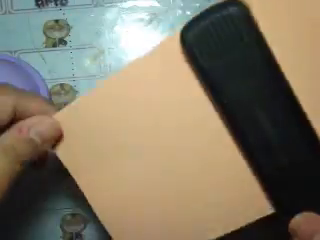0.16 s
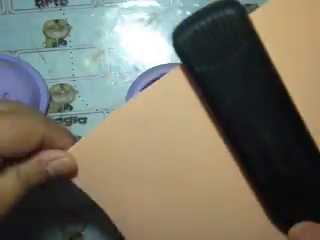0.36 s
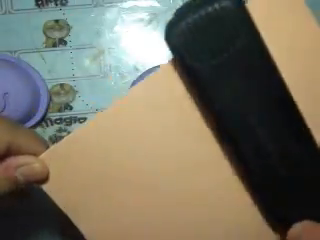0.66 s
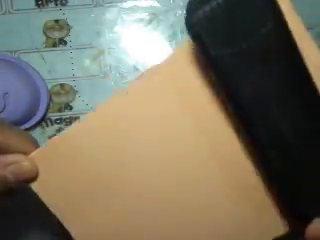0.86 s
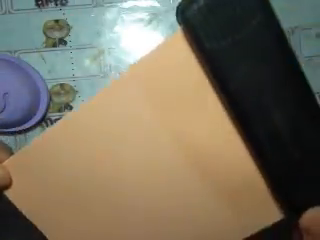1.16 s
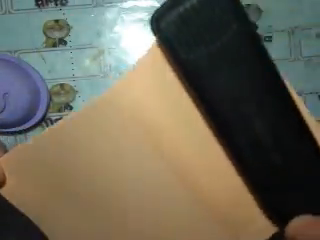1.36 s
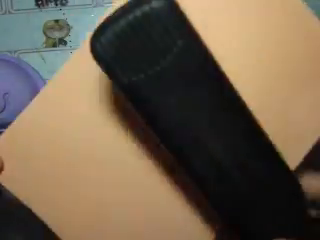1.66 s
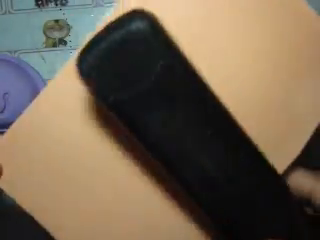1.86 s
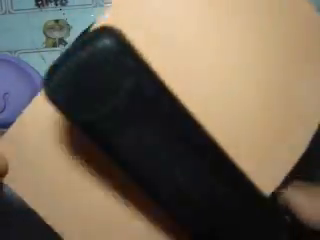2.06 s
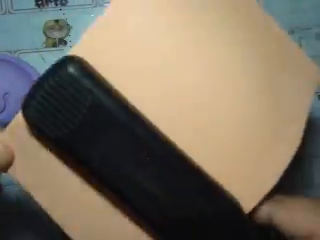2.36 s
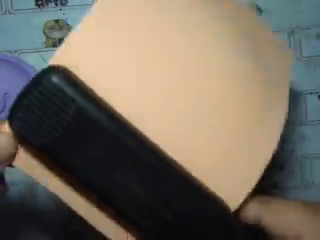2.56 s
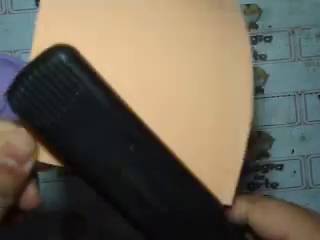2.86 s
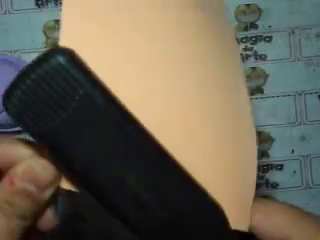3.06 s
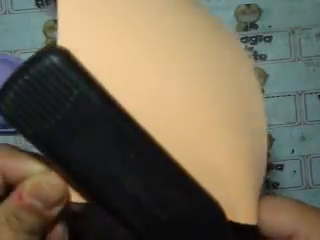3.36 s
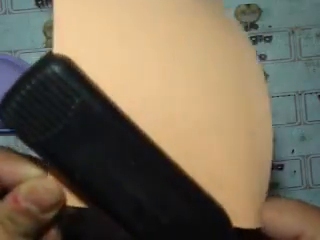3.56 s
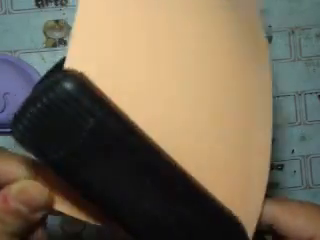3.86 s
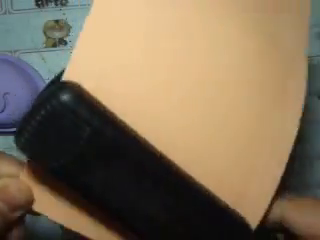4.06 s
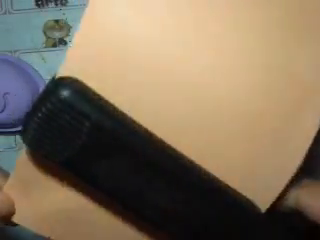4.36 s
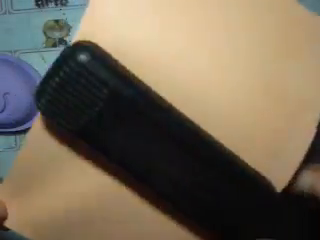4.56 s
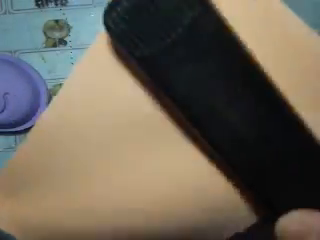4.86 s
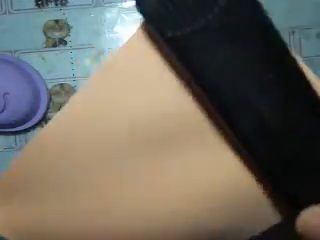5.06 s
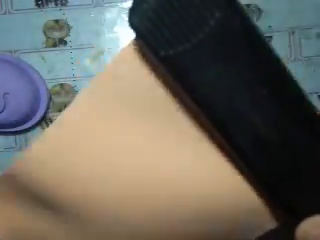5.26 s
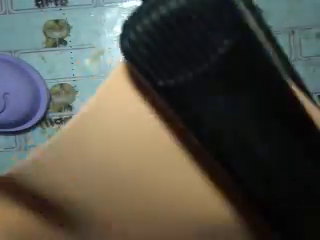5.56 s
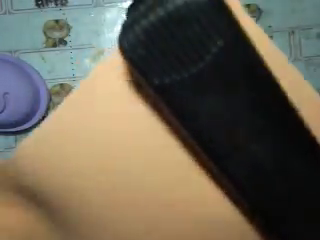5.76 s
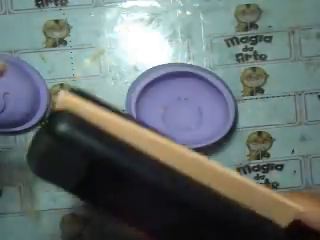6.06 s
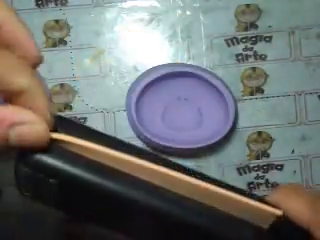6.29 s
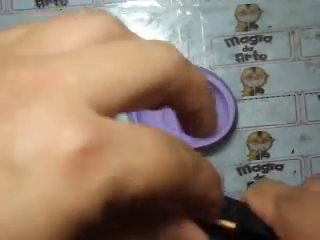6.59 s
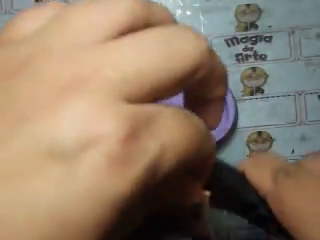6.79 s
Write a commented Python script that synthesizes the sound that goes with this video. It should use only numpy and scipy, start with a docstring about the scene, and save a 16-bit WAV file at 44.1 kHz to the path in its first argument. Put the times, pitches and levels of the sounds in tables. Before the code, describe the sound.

A loud plastic clack strikes at once, followed by a brief foam slide. From about 0.35 seconds, hinged plates snap shut roughly every 0.2 seconds until 5.86. Each clamp is a hard, mid-bright tick with a few milliseconds of uneven rattle, a small padded thud and a short room echo; the strongest distort. Fainter opening clicks fall between, with scattered light knocks, busiest around 1.45 to 1.75. Snaps weaken around 2.5 to 2.9, then strengthen again from 3.3. Soft, grainy foam hiss fills the gaps, dipping just after clamps. Far behind, low traffic rumbles and a vehicle's drone climbs in pitch from about 2.4 to 6 seconds. After 5.9 the clacking ceases: quiet sliding swells near 6.25, faint knocks pass, then a modest opening click at 6.83 and small taps end it near 6.9. The microphone is close, its treble muffled.

```python
"""Snapping plastic tongs

Plastic tongs snap open and shut about five times a second on a foam sheet, close to a narrow-band microphone.
Each blow is a tick and an uneven burst of clicks ringing the shell, with a short echo; filtered clicks rustle after.
The sheet slides with a hiss of dense clicks, hushed just after each clamp. Behind it lie room air, traffic rumble
in coloured noise and a vehicle speeding up in gliding sines. The loudest snaps overload the recorder.
"""
import sys
import numpy as np
from scipy import signal
from scipy.io import wavfile

SR = 44100
rng = np.random.default_rng(int(sys.argv[2]) if len(sys.argv) > 2 else 0)


def store_pcm(level_fs):
    """Save levels as 16-bit WAV."""
    pcm = np.round(np.clip(level_fs, -1, 1) * 32767).astype(np.int16)
    wavfile.write(sys.argv[1], SR, np.atleast_2d(pcm).T)


N = 305613

# Plates clamp shut: t/s, peak level/dB, low modes level/dB, brightness/dB, rattle length/ms
CLAMPS = [(0.0005, 2, -12, -7, 3.86), (0.364, -2.5, -12, 7.5, 7), (0.574, -1.5, -10.5, 7, 8.8),
          (0.758, -2, -8.5, 9.5, 8), (0.946, -3.5, -12, 4, 5.86), (1.131, -0.2, -11, 3, 6.7),
          (1.313, -2.2, -14.5, 1, 6.8), (1.547, 0.2, -13, 1, 7.9), (1.758, -5.5, -15, -9, 6.9),
          (1.948, 1, -14.5, -6, 8.2), (2.141, 2, -10, -2, 6.9), (2.339, 0.2, -9, 0.5, 6.7),
          (2.538, -5.5, -8.5, -1, 3.5), (2.71, -11.5, -18.5, 3, 6.4), (2.91, -15, -12.5, -2, 3.4),
          (3.121, -6, -13.5, -15.5, 4.43), (3.32, 1.5, -13, 2, 8.24), (3.52, -2.5, -5.5, 6, 6.47),
          (3.723, 0, -10.5, 7.5, 9.94), (3.916, -2.5, -12.5, 2, 7), (4.105, -4, -8.5, -1.5, 5.01),
          (4.285, -2.5, -9.5, 0.5, 5.45), (4.478, -4, -8.5, -4, 4.4), (4.678, -5.5, -11.5, -5.5, 3.28),
          (4.879, -1.5, -13.5, -7, 4.77), (5.09, -1.5, -10.5, 2, 6), (5.274, -3, -10.5, -1.5, 5.25),
          (5.474, -5.5, -8.5, -18, 6.96), (5.671, -0.8, -7.5, 2, 7.7), (5.856, -6, -8.5, -12, 8.1)]
# Arms spring open against the hinge stop: t/s, peak level/dB, low modes level/dB, brightness/dB
OPENINGS = [(0.295, -18.5, -22, 0), (0.496, -12.5, -21, 7), (0.685, -16, -39, -0.5), (0.873, -15, -42, 3),
            (1.058, -16, -29, 2), (1.247, -17.5, -23, 2), (1.426, -19.5, -24, 3), (1.646, -18.5, -21, 2.5),
            (1.855, -16.5, -23, -7), (2.048, -18, -25, -10), (2.244, -21, -27, 2), (2.44, -17.5, -27, -1),
            (2.645, -15, -28, 3), (2.834, -27.5, -16, 0), (3.042, -21.5, -13, 2), (3.258, -28.5, -10, 1),
            (3.453, -22.5, -10.5, 0), (3.658, -21, -21, -3), (3.852, -22, -13, -2), (4.053, -18.5, -18, 3),
            (4.234, -15.5, -16, -1.5), (4.415, -18, -10.5, -1.5), (4.614, -14.5, -16.5, 3.5),
            (4.806, -19.5, -22, 5.5), (5.011, -17, -37, 4), (5.217, -21, -16, 4.5), (5.403, -9.5, -25, -16),
            (5.571, -16.5, -18, 2.5), (5.789, -18, -22, -0.5), (6.827, -14, -17.5, 2)]
# Light knocks of plates and sheet on the way shut: t/s, peak level/dB, low modes level/dB, rattle length/ms
KNOCKS = [(0.56, -26, -10, 15), (0.72, -34, -25, 7.4), (0.746, -23, -13, 4.4), (0.751, -24, -20, 2.7),
          (0.906, -24, -21, 9), (0.926, -27, -8, 2.7), (0.933, -34, -4, 5.4), (1.094, -23, -25, 9.3),
          (1.118, -22.5, -19, 13), (1.281, -24, -13, 6.5), (1.435, -24.5, -19, 5.8), (1.451, -33, -21, 9),
          (1.472, -10, -21, 8.9), (1.487, -13, -19, 5.1), (1.536, -19, -20, 4.6), (1.657, -21.5, -24, 6.1),
          (1.697, -17, -23, 9.4), (1.738, -20.5, -6, 3.3), (1.744, -8, -8.5, 2.4), (1.902, -26.5, -10, 7.5),
          (1.934, -25.5, -9, 4), (2.099, -23.5, -17, 5.4), (2.128, -19, -9, 7.6), (2.296, -30, -15, 12),
          (2.317, -26, -8, 4.3), (2.492, -29, -17, 3.8), (2.506, -21.5, -6, 6.7), (2.528, -17, -11, 3),
          (2.675, -20.5, 0, 2.66), (2.728, -14.5, -8, 6.75), (2.874, -23.5, -12, 7.4),
          (3.073, -25, -11, 12), (3.112, -26, 1.5, 5.3), (3.293, -23.5, -9, 5.5), (3.896, -25, -8, 3.5),
          (4.083, -26, -14, 12), (4.27, -29.5, -3, 10.5), (4.465, -28, -17, 10.5), (4.868, -24.5, -6, 6.7),
          (5.048, -34, 1, 6.1), (5.249, -24.5, -15, 6.6), (5.44, -27, -8, 9.3), (5.619, -34.5, -8, 15),
          (5.66, -17, -25, 4.7), (5.826, -27, -12, 4.7), (6.018, -36, -8, 11), (6.26, -41, -10, 8),
          (6.46, -49, -9, 14), (6.761, -37, -25, 6), (6.869, -30, -21, 6), (6.923, -23.5, -20, 5.9)]
# Ringing modes of the plastic shell: f/Hz, level/dB, t60/s
SHELL_MODES = [(778, -13.5, 0.015), (988, -11.5, 0.02), (1249, -14, 0.023), (1471, -7, 0.01),
               (1651, -5, 0.012), (1908, -2.5, 0.0095), (2180, -1, 0.0072), (2468, -7.5, 0.015),
               (2846, -7.5, 0.019), (3008, -3, 0.018), (3280, -8.5, 0.024), (3614, -7, 0.015),
               (3900, -14, 0.014), (4254, -27, 0.024), (4833, -20.5, 0.0076), (5270, -20, 0.0056)]
# Arms pushed through the foam: f/Hz, level/dB, t60/s
THUD_MODES = [(236, -23.5, 0.02), (424.6, 3.5, 0.017), (574, 3.5, 0.017)]
# Sliding sheet: t/s, middle hiss level/dB, upper hiss against it/dB, lower hiss against it/dB
SLIDE = [(0.0, -31.5, 2.5, -10), (0.12, -40.5, 0, -4.5), (0.23, -44, 1, -0.5), (0.5, -43, -2, -5),
         (1.1, -35, -13, -10.5), (1.7, -39.5, -4, -5), (2.4, -36.5, -10.5, -7.5), (3.4, -34.5, -11, -6.5),
         (4.0, -37, -9, -8), (4.5, -41, -10, -4), (4.8, -43.5, -7, -5.5), (5.0, -36, -10, -6.5),
         (5.6, -39.5, -8, -6.5), (5.93, -41, -11, -3.5), (6.07, -41, -9, -1.5), (6.25, -36.5, -15, -11),
         (6.45, -38, -12, -5), (6.6, -43, -6, -12.5), (6.76, -44.5, -4, 2), (6.93, -36.5, -4, -7)]
# Resonances of the three hisses, relative levels: f/Hz, width/Hz, level/dB
MIDDLE_HISS = [(2385, 280, -2), (2620, 160, 0), (2930, 620, -1.5)]
UPPER_HISS = [(3050, 660, 4.5), (3830, 360, -4.5), (4240, 860, -3.5)]
LOWER_HISS = [(1440, 120, 7), (1656, 130, 4.5), (1875, 250, -13.5)]
# Firing tone and lower drone of the vehicle: t/s, f/Hz, level/dB
FIRING = [(0.9, 84, -48), (1.05, 84.1, -38.5), (1.4, 81.76, -49), (2.0, 80.9, -39), (2.4, 82.2, -45),
          (2.65, 85, -38), (3.199, 91.75, -35.5), (3.45, 96, -40.5), (3.95, 101.5, -36.5),
          (4.3, 111.7, -40), (4.7, 121.1, -41.5), (5.082, 135, -45.5), (5.5, 147, -38), (5.979, 153, -43.5),
          (6.1, 156, -58)]
DRONE = [(2.4, 50.2, -42.5), (2.999, 54.3, -34.5), (3.55, 53.8, -32), (3.89, 55.64, -44),
         (4.34, 61.54, -42), (4.76, 62, -48), (5.099, 77.2, -46), (5.5, 87.14, -38.5), (5.961, 84, -39),
         (6.2, 84.5, -44)]
# Exhaust resonances, as overtones against their tone: f/Hz, level/dB
EXHAUST = [(100, -28), (120, -5), (158, -20), (178, -4), (205, -32), (270, -26), (345, -10.5), (400, -9),
           (470, -29)]
# Spectrum of the traffic, relative: f/Hz, level per Hz/dB
TRAFFIC_SPECTRUM = [(20, -17), (30, 8.5), (45, 4.5), (85, 5), (130, -1.5), (185, -9.5), (215, -29),
                    (260, -27)]
# Traffic loudness over time: t/s, level/dB
RUMBLE = [(0.0, -38), (0.75, -47.5), (1.02, -38), (1.31, -42), (1.97, -37), (2.4, -40.5), (3.5, -38.5),
          (4.9, -36.5), (6.4, -38), (6.93, -36)]
# Spectrum of the room air, relative: f/Hz, level per Hz/dB
AIR_SPECTRUM = [(190, -13), (250, -14.5), (340, 1), (650, -9.5), (1000, -7.5), (2000, -9.5), (3000, -5.5),
                (4300, -24.5), (5300, -13.5), (6500, -32)]

# Upper and top modes of each kind of blow against the middle ones
CLAMP_UPPER_DB = 1.5
OPENING_UPPER_DB, OPENING_TOP_DB, OPENING_RATTLE_MS = 4.5, -5.5, 5.8
KNOCK_UPPER_DB, KNOCK_TOP_DB = 6, -11.5
UPPER_SHARE = 0.14   # share of a blow's brightness that also reaches the upper modes
LIGHT_FADE = 0.31   # the lighter the blow, the faster its rattle fades (dB per dB)
REBOUND_MS, REBOUND_DB = 9.1, -19   # the arms bounce back once
CRACK_DB, CRACK_HZ, CRACK_WIDTH_HZ = 10.5, 2500, 3160   # the tick of first contact
ROOM_T60_S, ROOM_ECHO_DB = 0.11, -22.5
RUSTLE_DB, RUSTLE_T60_S = -35.5, 0.16
GRIP_DB, GRIP_HOLD_S, GRIP_RELEASE_S = -4, 0.093, 0.04   # the shut plates hold the sheet still
HISS_PATCHY_DB = 2.5   # each band of the hiss wavers on its own
AIR_DB = -44.5
MIC_LOW_HZ, MIC_STOP_HZ, RECORDER_STOP_HZ = 35, 6150, 16800   # low cut, then where each top cut is complete


def blows():
    """Every blow of the tongs: t/s, then peak, low, upper and top mode levels/dB, then rattle length/ms."""
    rows = []
    for t, peak_db, lows_db, bright_db, rattle_ms in CLAMPS:
        upper_db = CLAMP_UPPER_DB + UPPER_SHARE * bright_db
        rows.append((t, peak_db, lows_db, upper_db, bright_db, rattle_ms))
    for t, peak_db, lows_db, bright_db in OPENINGS:
        upper_db = OPENING_UPPER_DB + UPPER_SHARE * bright_db
        rows.append((t, peak_db, lows_db, upper_db, OPENING_TOP_DB + bright_db, OPENING_RATTLE_MS))
    for t, peak_db, lows_db, rattle_ms in KNOCKS:
        rows.append((t, peak_db, lows_db, KNOCK_UPPER_DB, KNOCK_TOP_DB, rattle_ms))
    return np.array(rows)


def snaps():
    """First contact, quick uneven rattle and rebound strike each shell mode with a strength of its own."""
    s, peak_db, lows_db, upper_db, top_db, rattle_ms = blows().T[:, :, None]
    # contact 0 is the first, 1 to 5 rattle on in their slots, the last two are the rebound
    contacts = 8
    slot = np.arange(contacts)
    late = (slot + rng.random((len(s), contacts))) * (slot > 0) / contacts   # share of the rattle length
    delay_ms = late * rattle_ms
    delay_ms[:, -2:] = REBOUND_MS + 1.3 * rng.standard_normal((len(s), 2))
    at = np.clip(((s + delay_ms / 1000) * SR).astype(int), 0, N - 1)
    first = at[:, 0]
    strengths = rng.standard_normal((len(s), len(SHELL_MODES), contacts))
    out = np.zeros(N)
    for k, (hz, level_db, t60) in enumerate(SHELL_MODES):
        # where the blow lands sets how much it wakes the low, upper and top modes
        low, upper, top = np.clip([(1400 - hz) / 500, (hz - 2200) / 500, (hz - 3300) / 300], 0, 1)
        colour_db = low * (lows_db + 11.5) + upper * upper_db + top * top_db
        # the first contact is dull, the upper modes swell during the rattle
        fade_db = (LIGHT_FADE * peak_db - 8.5) * late
        contact_db = fade_db - 5.5 * upper * np.exp(-late / 0.049)
        # a firm clamp smothers the bounce, a light knock lets it through
        contact_db[:, -2:] = REBOUND_DB - 0.54 * peak_db
        gain = from_db(peak_db + colour_db + level_db + contact_db)
        clicks = clicks_at(at, gain * (0.17 + 1.204 * strengths[:, k]))
        # foam-padded contacts excite little beside the mode
        out += band(ring(clicks, hz, t60), hz, 0.63 * hz)
    return out + crack(first, peak_db[:, 0]) + thud(first, (peak_db + lows_db)[:, 0])


def crack(at, peak_db):
    """The first contact itself, a sharp click through a wide band-pass."""
    tick = clicks_at(at, from_db(peak_db + CRACK_DB)) + 1e-18
    return band(band(tick, CRACK_HZ, CRACK_WIDTH_HZ), CRACK_HZ, CRACK_WIDTH_HZ)


def thud(at, push_db):
    """The arms push through the foam: a few short low modes, uneven from blow to blow."""
    uneven_db = 3.7 * rng.standard_normal((len(at), len(THUD_MODES)))
    out = np.zeros(N)
    for k, (hz, level_db, t60) in enumerate(THUD_MODES):
        push = clicks_at(at, from_db(push_db + level_db + uneven_db[:, k]))
        out += band(ring(push, hz, t60), hz, 1.73 * hz)
    return out


def room(x):
    """Diffuse echo: the room answers with a dying noise after a short gap."""
    t = np.arange(SR // 4) / SR
    answer = rng.standard_normal(len(t)) * from_db(-60 * t / ROOM_T60_S) * (t > 0.004)
    return signal.fftconvolve(x, answer / np.sqrt(np.sum(answer ** 2)))[:N]


def rustle():
    """The struck sheet crackles on for a moment, dying away exponentially."""
    s, peak_db = blows().T[:2]
    shakes = np.zeros(N)
    shakes[(s * SR).astype(int)] = from_db(peak_db + RUSTLE_DB)
    dying = signal.lfilter([1], [1, -from_db(-60 / (RUSTLE_T60_S * SR))], shakes + 1e-18)
    resonances = [(2000, 650, 0), (3000, 600, -7.5), (3630, 420, -11.5)]   # f/Hz, width/Hz, level/dB
    return dying * hiss(resonances, grains_per_s=580, spread_db=3.6)


def sheet():
    """Sliding friction hisses in three wavering bands, hushed while the plates grip."""
    t = np.arange(N) / SR
    shut = np.transpose(CLAMPS)[0]
    since_shut = t - shut[np.maximum(np.searchsorted(shut, t) - 1, 0)]
    slide_db, upper_db, lower_db = in_time(SLIDE)
    slide_db = slide_db + np.interp(since_shut, [GRIP_HOLD_S, GRIP_HOLD_S + GRIP_RELEASE_S], [GRIP_DB, 0])
    out = np.zeros(N)
    for against_db, resonances in (0, MIDDLE_HISS), (lower_db, LOWER_HISS), (upper_db, UPPER_HISS):
        waver_db = HISS_PATCHY_DB * drift(4.7) + 2.0 * drift(11)
        out += from_db(slide_db + against_db + waver_db) * hiss(resonances, grains_per_s=3500, spread_db=2.1)
    return out


def hiss(resonances, grains_per_s, spread_db):
    """Foam cells catch on the plates: uneven random clicks through broad resonances; rms 1."""
    sizes = from_db(spread_db * np.minimum(rng.exponential(1, N), 4)) * rng.choice([-1, 1], N)
    grains = (rng.random(N) < grains_per_s / SR) * sizes
    out = np.zeros(N)
    for k, (hz, width, level_db) in enumerate(resonances):
        resonance = band(band(grains, hz, width), hz, width)
        out += (-1) ** k * from_db(level_db) / np.sqrt(width) * resonance   # neighbours in opposite polarity
    return rms_one(out)


def vehicle():
    """Firing tone and drone climb as it gathers speed; overtones swell on crossing exhaust resonances."""
    pipe_hz, pipe_db = np.transpose(EXHAUST)
    out = np.zeros(N)
    for span in FIRING, DRONE:
        hz, level_db = in_time(span)
        out += tone(hz, level_db, span, rough_db=3.5)
        for order in 2, 3:
            overtone_db = np.interp(np.log(order * hz), np.log(pipe_hz), pipe_db)
            out += tone(order * hz, level_db + overtone_db, span, rough_db=4.5)
    return out


def tone(hz, level_db, span, rough_db):
    """A gliding sine of wavering level, an engine tone faded in and out around its span."""
    start, end = span[0][0], span[-1][0]
    fade = np.interp(np.arange(N) / SR, [start - 0.15, start, end, end + 0.34], [0, 1, 1, 0])
    gain = np.sqrt(2) * from_db(level_db + rough_db * drift(20.0))   # level is rms
    return fade * gain * np.sin(2 * np.pi * np.cumsum(hz) / SR)


def traffic():
    """Distant rumble: low coloured noise that swells and sinks."""
    return from_db(in_time(RUMBLE)[0]) * coloured(TRAFFIC_SPECTRUM, patchy_db=1.0)


def room_air():
    """The steady noise floor of the room, as coloured noise."""
    return from_db(AIR_DB) * coloured(AIR_SPECTRUM, patchy_db=0.0)


def coloured(spectrum, patchy_db):
    """Noise in third-octave bands, each at its own level and wavering by patchy_db; rms 1."""
    hz, level_db = np.transpose(spectrum)
    edges = hz[0] * 2 ** np.arange(0, np.log2(hz[-1] / hz[0]), 1 / 3)
    white = rng.standard_normal((2, N))   # neighbouring bands use different noise
    out = np.zeros(N)
    for k, (low, high) in enumerate(zip(edges, edges[1:])):
        sos = signal.butter(2, [low, high], "band", fs=SR, output="sos")
        band_db = np.interp(np.log(low * high) / 2, np.log(hz), level_db)
        out += signal.sosfilt(sos, white[k % 2]) * from_db(band_db + patchy_db * drift(9))
    return rms_one(out)


def from_db(db):
    """Decibels to gain."""
    return 10 ** (np.asarray(db) / 20)


def rms_one(x):
    """Scale to unit rms."""
    return x / np.sqrt(np.mean(x ** 2) + 1e-20)


def in_time(rows):
    """Columns of a curve table at every sample."""
    s, *columns = np.transpose(rows)
    return [np.interp(np.arange(N) / SR, s, c) for c in columns]


def drift(rate_hz):
    """Slow random wander of rms 1: noise low-passed near rate_hz, made at every 40th sample."""
    r = np.exp(-2 * np.pi * rate_hz * 40 / SR)
    slow = signal.lfilter([1], [1, -2 * r, r * r], rng.standard_normal(N // 40 + 2002))[2000:]
    return np.interp(np.arange(N) / 40, np.arange(len(slow)), rms_one(slow))


def clicks_at(at, heights):
    """Single-sample clicks, summed where they coincide."""
    clicks = np.zeros(N)
    np.add.at(clicks, at, heights)
    return clicks


def ring(clicks, hz, t60):
    """A damped resonator: a unit click sets off a dying sine that starts at height 1."""
    r, w = from_db(-60 / (t60 * SR)), 2 * np.pi * hz / SR
    return signal.lfilter([0, np.sin(w)], [1, -2 * r * np.cos(w), r * r], clicks + 1e-18)


def band(x, hz, width):
    """Gentle band-pass around hz."""
    return signal.sosfilt(signal.butter(1, [hz - width / 2, hz + width / 2], "band", fs=SR, output="sos"), x)


def scene():
    """Tongs with their echo, rustling and sliding sheet, then street and room air."""
    tongs = snaps()
    echo = from_db(ROOM_ECHO_DB) * room(tongs)
    foam = rustle() + sheet()
    street = vehicle() + traffic()
    return (tongs + echo + foam + street + room_air())[None]


def record(dry):
    """The input rounds big peaks, a narrow band passes, and overshoots are cut flat, spraying treble."""
    rounded = 0.71 * np.tanh(dry / 0.98)
    narrow = signal.sosfilt(signal.cheby2(16, 75, MIC_STOP_HZ, fs=SR, output="sos"), rounded)
    narrow = signal.sosfilt(signal.butter(2, MIC_LOW_HZ, "high", fs=SR, output="sos"), narrow)
    flat = np.clip(narrow - 0.0064, -0.72, 0.72)   # a small constant offset makes the clipping lopsided
    return signal.sosfilt(signal.cheby2(12, 70, RECORDER_STOP_HZ, fs=SR, output="sos"), flat)


dry = scene()
out = record(dry)
store_pcm(out)
```